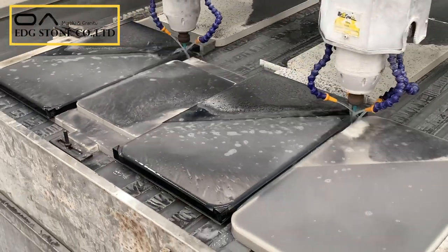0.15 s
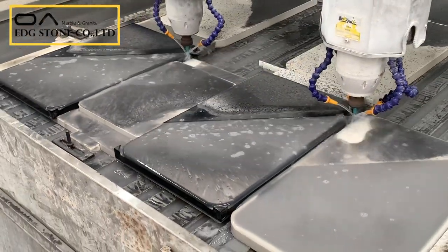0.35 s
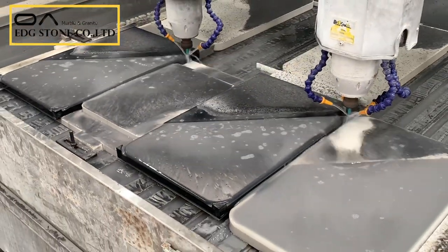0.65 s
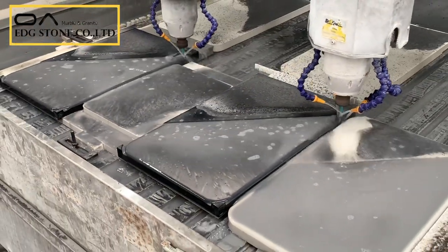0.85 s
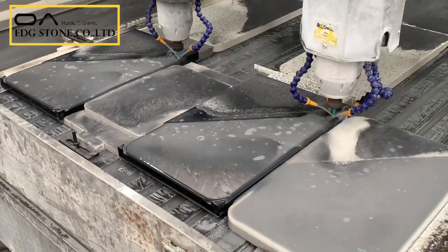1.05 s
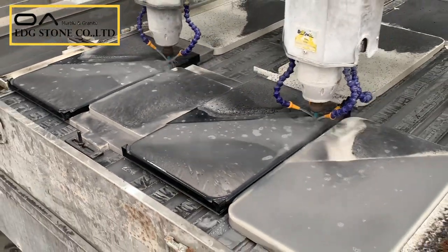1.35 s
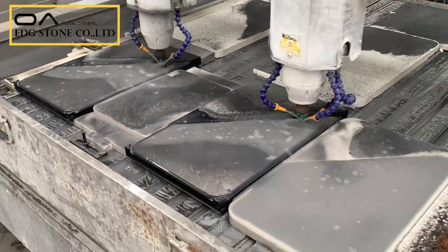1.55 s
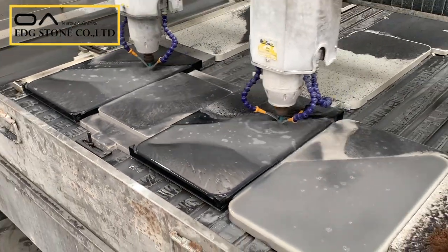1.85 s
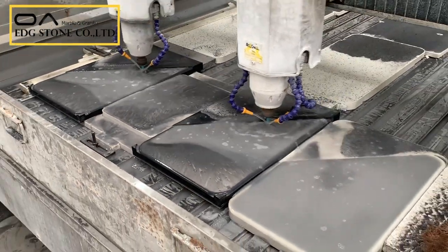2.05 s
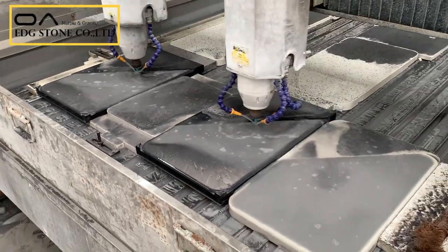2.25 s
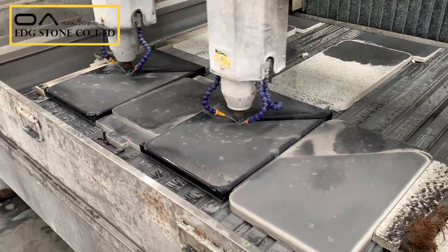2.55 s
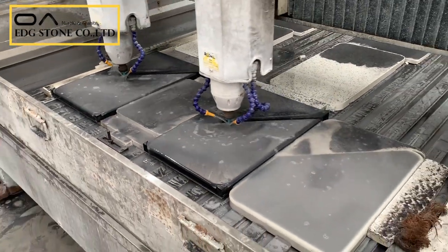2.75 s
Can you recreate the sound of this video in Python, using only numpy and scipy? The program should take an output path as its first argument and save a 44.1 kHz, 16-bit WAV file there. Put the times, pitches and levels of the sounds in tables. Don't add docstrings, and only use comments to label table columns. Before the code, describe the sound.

A stone-grinding spindle whines close by, with gritty hiss, over hall rumble, water spray, a thin wavering high whistle and fast cable-chain ticks; a second spindle hums. At first the whine jumps and stutters; grinding drops at 0.45 s and returns with a sharp chip snap near 0.66 s. From about 0.86 s a moving growl swells. After 1.2 s the pitch dips slightly, the buzzing whine steadies and the hiss brightens until about 2.9 s.

```python
import sys
import numpy as np
from scipy import signal
from scipy.fft import rfft, irfft, next_fast_len
from scipy.io import wavfile
from scipy.ndimage import uniform_filter1d

SR = 44100
rng = np.random.default_rng(int(sys.argv[2]) if len(sys.argv) > 2 else 0)


def persist_wave(psi):
    counts = np.round(np.clip(psi, -1, 1) * 32767).astype(np.int16)
    wavfile.write(sys.argv[1], SR, np.atleast_2d(counts).T)


def amplitude_ratio(level_db):
    exponent = np.asarray(level_db, float) / 20
    return 10 ** exponent


N = 127449


def read(points, hz):
    f, v = np.transpose(points)
    return np.interp(np.log(hz + 1), np.log(f + 1), v)


def curve(points, t):
    return np.interp(t, *np.transpose(points))


def evened(x):
    return x / np.sqrt(np.mean(x ** 2) + 1e-20)


def ramp(t, start, length):
    return np.clip((t - start) / length, 0, 1)


def steadiness(t):
    return ramp(t, 1.2, 0.294)


def drift(rate_hz, count):
    knots = np.arange(0, N + 256, 256)
    f = np.geomspace(.7, rate_hz, 16)[:, None]
    phase = f * knots / SR + rng.random((count, 16, 1))
    slow = (np.sin(2 * np.pi * phase) / f ** 0.14).sum(1)
    return np.array([np.interp(np.arange(N), knots, evened(row)) for row in slow])


# (frequency [Hz], lead [rad])
PORT_LEAD = [(0, 0), (900, -.8), (1700, -3), (3900, -6.3), (5200, -9.5), (6300, -12.7), (7950, -17.3),
             (14900, -3.14)]


def port_turn(hz):
    return np.exp(1j * curve(PORT_LEAD, hz))


# (frequency [Hz], left minus right [dB])
PORT_TILT = [(60, -1), (130, -3.3), (290, 4), (640, -2.4), (1410, 1.5), (3100, 0), (6820, -3), (15000, 2.5)]


def port_tilt(hz):
    return amplitude_ratio(read(PORT_TILT, hz) / 2)


def at_ports(x):
    size = next_fast_len(N + 512)
    hz = np.fft.rfftfreq(size, 1 / SR)
    tilt = port_tilt(hz)
    return irfft(rfft(x, size) * np.array([tilt, port_turn(hz) / tilt]), size)[:, :N]


# (frequency [Hz], likeness [0-1])
PORT_LIKENESS = [(60, .995), (250, .93), (550, .6), (1200, .55), (3000, .3), (7800, .4), (8800, .88),
                 (15000, .99)]


def hiss(field_db, patchy_db):
    frames = N // 128 + 5
    hz = np.fft.rfftfreq(512, 1 / SR)[:, None]
    a, b, c, d, patches = rng.standard_normal((frames, 257, 5)).T
    patches = uniform_filter1d(patches, size=6, axis=0)
    patches = evened(uniform_filter1d(patches, size=16, axis=1))
    same = np.clip(read(PORT_LIKENESS, hz), 0, 1)
    left = a + 1j * b
    right = (same * left + np.sqrt(1 - same ** 2) * (c + 1j * d)) * port_turn(hz)
    tilt = port_tilt(hz)
    level = amplitude_ratio(field_db(hz, np.arange(frames) * 128 / SR) + patchy_db * patches)
    z = np.array([left * tilt, right / tilt]) * level
    return signal.istft(z * np.sqrt(SR * 3 / 1024), nperseg=512, noverlap=384)[1][:, :N]


# (frequency [Hz], level [dB per Hz])
HALL_NOISE = [(30, -54), (52, -57), (110, -66), (250, -68), (900, -87), (1500, -78), (7000, -83.5),
              (15500, -99)]


def hall():
    return hiss(lambda hz, s: read(HALL_NOISE, hz) + 0 * s, 1.0)


def drive_whistle(t):
    level_db = -53.5 - 4 * steadiness(t) + 6.5 * drift(9.46, count=1)[0]
    return at_ports(amplitude_ratio(level_db) * np.sqrt(2) * np.sin(2 * np.pi * 10380 * t))


def chain_ticks(t):
    first_s, gap_s = .0405, .04575
    ring_hz, width_hz, tick_db = 9250, 260, -30
    at = (np.arange(first_s, t[-1] - .01, gap_s) * SR).astype(int)
    luck = rng.random((len(at), 2))
    hits = np.zeros(N)
    hits[at] = amplitude_ratio(tick_db - 5.0 * luck[:, 0])
    hits[at + 130] = amplitude_ratio(tick_db - 4.0 - 6.0 * luck[:, 1])
    u = t[:600]
    ring = (1 - np.exp(-u / 0.0002)) * np.exp(-np.pi * width_hz * u) * np.sin(2 * np.pi * ring_hz * u)
    return at_ports(signal.oaconvolve(hits, ring)[:N])


def chip_snap(t):
    since = np.maximum(t - .667, 0)
    return at_ports(amplitude_ratio(-24 - 60 * since / 0.015) * np.sin(2 * np.pi * 6000 * since))


LOADED_HZ = 398.53


def shaft_turns(t):
    free_hz = 399.6
    return np.cumsum(free_hz + (LOADED_HZ - free_hz) * steadiness(t)) / SR


def skirts(hz):
    fade = ramp(hz, 520, 300) * (1 - ramp(hz, 4600, 1000))
    return 2 * (np.cos(2 * np.pi * hz / LOADED_HZ) - .5) * fade


# (frequency [Hz], level [dB per Hz])
FEED_GROWL = [(80, -69.5), (200, -65.5), (400, -66), (700, -68), (950, -72), (1400, -67.5), (3000, -75),
              (6000, -73.5)]
# (frequency [Hz], width [Hz], level [dB])
HOUSING_TONES = [(462, 44, -43.5), (724, 21, -41.5), (1333, 46, -42.5), (290.3, 3.8, -50)]


def feed(t):
    start_s, rise_s, idle_db = 0.858, 0.18, -8.5
    tones = np.zeros(N)
    for hz, width_hz, db in HOUSING_TONES:
        r = np.exp(-np.pi * width_hz / SR)
        ringing = [1, -2 * r * np.cos(2 * np.pi * hz / SR), r * r]
        shaking = np.diff(rng.standard_normal(N + 1))
        tones += amplitude_ratio(db) * evened(signal.lfilter([1], ringing, shaking))
    growl = hiss(lambda hz, s: read(FEED_GROWL, hz) + skirts(hz) + 0 * s, 2.7)
    return (growl + at_ports(tones)) * amplitude_ratio(idle_db * (1 - ramp(t, start_s, rise_s)))


# (time [s], level [dB])
TOOL_BITE = [(0.0, -30), (0.23, -34), (0.3, -31), (0.44, -34.5), (0.452, -49.5), (0.652, -45), (0.664, -33),
             (0.705, -30.5), (0.73, -38.5), (0.78, -31), (0.99, -32.5), (1.04, -29), (1.34, -29),
             (1.75, -29.5), (1.82, -29.5), (2.55, -29), (2.78, -28.5), (2.89, -29)]


def bite_db(t):
    return curve(TOOL_BITE, t) + 28


# (frequency [Hz], level [dB per Hz])
SHALLOW_GRIT = [(900, -71), (2200, -71), (4200, -73.5), (6500, -63.5), (8200, -64), (10500, -70),
                (12500, -89), (15500, -74)]
# (frequency [Hz], level [dB per Hz])
DEEP_GRIT = [(900, -89.5), (2200, -75.5), (4200, -73.5), (6500, -66.5), (8200, -64), (10500, -66.5),
             (12500, -80.5), (15500, -72)]
# (time [s], depth [0 shallow, 1 deep])
CUT_DEPTH = [(0, 0.11), (.95, 0.13), (1.1, 0.034), (1.35, 2.3), (1.55, 1.8), (1.75, 1.3), (2.25, 1.9),
             (2.89, 0.7)]


def grit(t, turns):
    grains_per_s, grain_db, per_turn = 2500, 1.5, 0.21

    def field_db(hz, s):
        deep = curve(CUT_DEPTH, s)
        colour = (1 - deep) * read(SHALLOW_GRIT, hz) + deep * read(DEEP_GRIT, hz)
        return colour + bite_db(s) + skirts(hz)

    sizes = amplitude_ratio(grain_db * np.minimum(rng.exponential(1, N), 2.5))
    chips = sizes * (rng.random(N) < grains_per_s / SR)
    chips = evened(0.22 + uniform_filter1d(chips, size=40))
    return hiss(field_db, 2.94) * chips * (1 + per_turn * np.cos(2 * np.pi * turns))


# (time [s], level [dB])
FAR_UNBALANCE = [(0, -40), (.18, -36), (.32, -47), (.48, -32.5), (.85, -32.5), (.95, -37), (1.1, -30),
                 (1.25, -49), (2.0, -42), (2.3, -39), (2.89, -41)]


def far_spindle(t, turns):
    phase = 2 * np.pi * turns + 1.53 + 1.13 * drift(5, count=1)[0]
    far = np.sqrt(2) * amplitude_ratio(curve(FAR_UNBALANCE, t)) * np.cos(phase)
    return np.array([far, -far])


def phase_wobble(t):
    return 0.94 + (0.3 - 0.94) * steadiness(t)


# (steady level [dB], skipping level [dB], left minus right [dB], left leads [rad])
UPPER_ORDERS = [(-36, -42, -2, 2.9), (-32, -43, -4, -3.1), (-40, -48, -1, -2.9), (-37, -46, -1, 2.3),
                (-44, -51, -1, -1.9), (-43, -56, 0, -0.5), (-42, -52, -3, 1.7), (-41, -53, 1, -0.5),
                (-47, -54, -3, -1.6), (-48, -54, -2, 3.1), (-40, -54, -2, -2.2), (-42, -48, -7, 0.4),
                (-47, -53, -5, 0), (-42, -51, -3, 0.4), (-43, -48, 1, -2.2), (-46, -54, 1, -1.3),
                (-45, -56, 1, -1.2), (-47, -52, -2, -2.4), (-48, -52, 1, 2.9), (-51, -56, 2, 1.9),
                (-48, -61, 2, 1.2), (-51, -65, 1, 0.2), (-42, -62, 0, -0.3), (-47, -63, 1, -1),
                (-48, -70, 0, -1.9), (-48, -71, 0, -2.7), (-45, -66, 0, 3), (-53, -71, 0, 2.7),
                (-54, -70, 1, 1.2), (-57, -71, 0, 0), (-50, -71, 0, 0), (-51, -69, 1, -1)]
# (time [s], order [times shaft speed], level [dB], half-length [s], left leads [rad])
SKIPPING_SONGS = [(0.025, 5, -36, 0.025, -0.6), (0.075, 18, -39, 0.035, -2.2), (0.087, 7, -41, 0.077, 1.5),
                  (0.112, 15, -39, 0.032, 2.5), (0.212, 4, -39, 0.137, -1.2), (0.22, 5, -38, 0.04, -2.1),
                  (0.277, 7, -39, 0.037, 1.4), (0.294, 15, -41, 0.045, -0.3), (0.359, 5, -41, 0.045, -2.8),
                  (0.858, 16, -41, 0.065, 0.7), (0.898, 14, -40, 0.045, 2.4), (0.95, 13, -37, 0.092, -3),
                  (0.968, 5, -40, 0.309, -2.9), (1.05, 4, -39, 0.057, -1.4), (1.115, 19, -38, 0.047, 2.7),
                  (1.157, 16, -37, 0.045, 0.2), (1.18, 5, -37, 0.032, 3), (1.237, 23, -38, 0.16, 2.1),
                  (1.247, 4, -34, 0.115, -3.1)]
# (time [s], order [times shaft
# speed], level [dB], half-length [s], left leads [rad])
FURTHER_SONGS = [(1.364, 26, -35, 0.047, -0.3), (1.404, 5, -38, 0.107, -0.1), (1.634, 10, -40, 0.087, 3),
                 (1.639, 15, -36, 0.077, 2.9), (1.731, 15, -37, 0.18, 0.8), (1.774, 11, -37, 0.112, -0.6),
                 (1.838, 6, -39, 0.197, -2), (1.886, 20, -39, 0.115, -1.1), (1.908, 7, -36, 0.821, 2.3),
                 (2.018, 14, -35, 0.112, -2), (2.03, 5, -28, 0.284, 3.1), (2.055, 11, -36, 0.055, -0.1),
                 (2.108, 18, -39, 0.137, -2.6), (2.128, 7, -35, 0.496, 2.3), (2.262, 9, -40, 0.067, -0.3),
                 (2.267, 14, -36, 0.077, -2.8), (2.27, 4, -33, 0.274, 2.3), (2.422, 18, -38, 0.147, -2.1),
                 (2.462, 10, -37, 0.172, 1.3), (2.524, 6, -36, 0.2, -3.1), (2.549, 9, -40, 0.165, -0.3),
                 (2.624, 8, -40, 0.195, -1.6), (2.741, 17, -36, 0.057, 0.5), (2.774, 5, -31, 0.115, -2.6),
                 (2.856, 9, -35, 0.032, -1.3), (.438, 10, -38, .007, 0)]


def upper_orders(t, turns):
    count = len(UPPER_ORDERS)
    s = t[::64]
    settled = steadiness(s)
    steady_db, skip_db, tilt_db, lead = np.transpose(UPPER_ORDERS)[:, :, None]
    waver, shake, roam, lean = (drift(14, count)[:, ::64] for _ in range(4))
    waver_db = 4 + (2.2 - 4) * settled
    bed_db = steady_db - 2.5 + (skip_db + 6.5 - steady_db) * (1 - settled)
    level = amplitude_ratio(bed_db + bite_db(s) + waver_db * waver)
    lean = amplitude_ratio(tilt_db / 2 + 1.32 * lean)
    side = level ** 2 * np.exp(-1j * (lead + roam))
    for at, order, db, half, leads in SKIPPING_SONGS + FURTHER_SONGS:
        song = amplitude_ratio(db + 1 - 4.5 * ((s - at) / half) ** 2)
        level[order - 4] = np.maximum(level[order - 4], song)
        side[order - 4] += 2 * song ** 2 * np.exp(-1j * leads)
    angle = np.unwrap(np.angle(side))
    wobble = phase_wobble(t)
    start = rng.random(count)
    out = np.zeros((2, N))
    for k in range(count):
        gain, stray, turn, tilt = (np.interp(t, s, v[k]) for v in (level, shake, angle, lean))
        phase = 2 * np.pi * ((k + 4) * turns + start[k]) + wobble * stray
        out += gain * np.array([tilt * np.cos(phase), np.cos(phase + turn) / tilt])
    return np.sqrt(2) * out


# (time [s], level [dB])
NEAR_UNBALANCE = [(0.0, -64), (0.06, -34.5), (0.11, -45), (0.18, -31), (0.3, -55), (0.35, -33),
                  (0.41, -30.5), (0.47, -71), (0.53, -40.5), (0.93, -38.5), (0.96, -49), (1.21, -34.5),
                  (1.26, -46), (1.38, -29), (2.06, -30), (2.16, -26), (2.69, -25.5), (2.89, -27.5)]
# (time [s], level [dB])
EDGE_KNOCK = [(0, -40), (.22, -46), (.5, -36.5), (.64, -42.5), (.95, -38), (1.16, -41), (1.23, -23),
              (1.35, -21.5), (1.7, -26.5), (2.25, -26), (2.62, -21.5), (2.89, -27)]
# (time [s], level [dB])
SLAB_EDGE = [(0.0, -33), (0.03, -26.5), (0.18, -46), (0.37, -31.5), (0.4, -41.5), (1.1, -37.5), (1.13, -25),
             (1.24, -36), (1.83, -52), (1.84, -43.5), (2.6, -40), (2.89, -46)]
# (time [s], level [dB], half-length [s])
STONE_CATCHES = [(0.023, -29.5, 0.022), (0.105, -28, 0.023), (0.156, -32.5, 0.016), (0.265, -37, 0.02),
                 (0.346, -28.5, 0.022), (0.432, -27.5, 0.02), (0.692, -28, 0.012), (0.771, -26.5, 0.023),
                 (0.85, -23.5, 0.047), (1.096, -34.5, 0.052)]


def low_orders(t, turns):
    gains = [amplitude_ratio(curve(p, t)) for p in (NEAR_UNBALANCE, EDGE_KNOCK, SLAB_EDGE)]
    for at, db, half in STONE_CATCHES:
        gains[1] = gains[1] + amplitude_ratio(db) * np.exp(-((t - at) / half) ** 2)
    wobble = (1 - steadiness(t)) * phase_wobble(t)
    low = np.zeros(N)
    for order, gain, stray in zip((1, 2, 3), gains, drift(6.7, count=3)):
        low += gain * np.cos(2 * np.pi * order * turns + wobble * stray)
    return np.sqrt(2) * at_ports(low)


def scene():
    t = np.arange(N) / SR
    turns = shaft_turns(t)
    background = hall() + drive_whistle(t) + chain_ticks(t) + chip_snap(t) + feed(t)
    whine = far_spindle(t, turns) + upper_orders(t, turns) + low_orders(t, turns)
    return background + grit(t, turns) + whine


def band_limit(x):
    return signal.sosfilt(signal.butter(12, 15740, fs=SR, output="sos"), x)


def record(dry):
    low_cut = signal.butter(8, 47, "high", fs=SR, output="sos")
    mix = signal.sosfilt(low_cut, dry)
    return band_limit(mix)


dry = scene()
out = record(dry)
persist_wave(out)
```